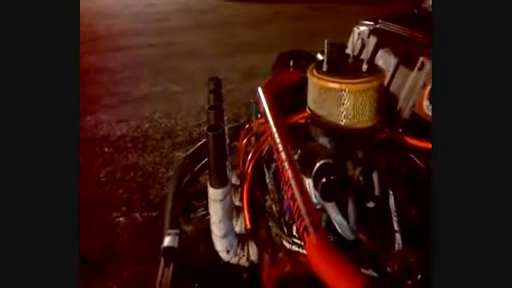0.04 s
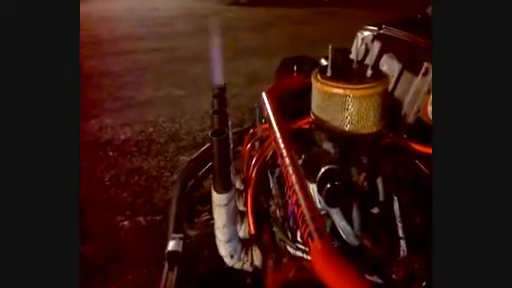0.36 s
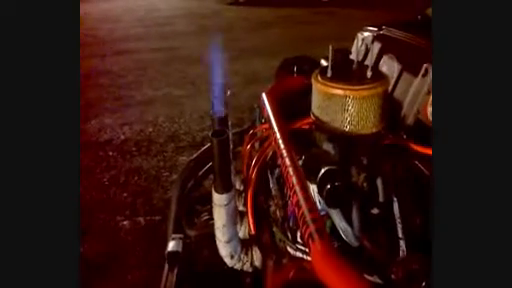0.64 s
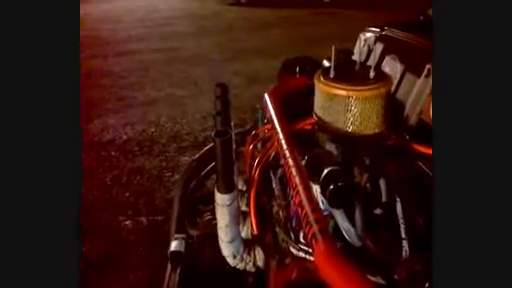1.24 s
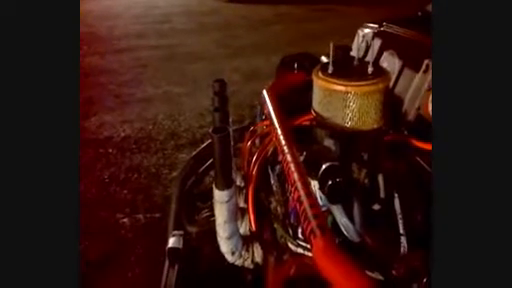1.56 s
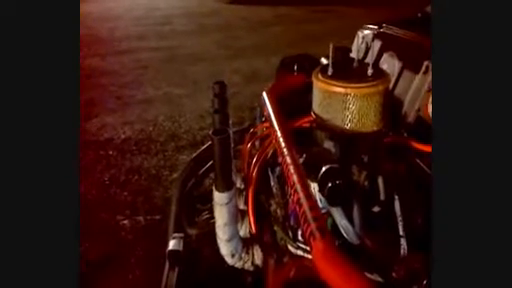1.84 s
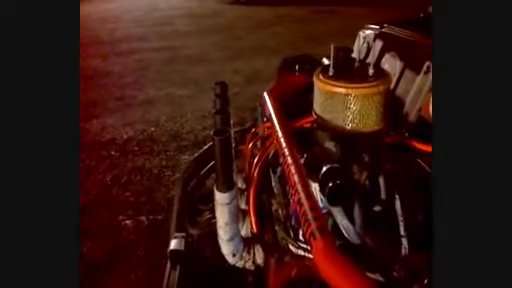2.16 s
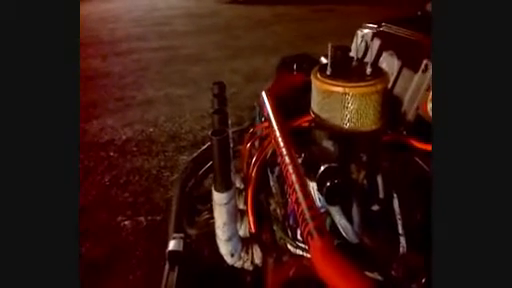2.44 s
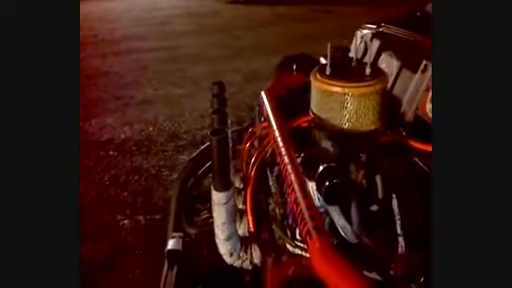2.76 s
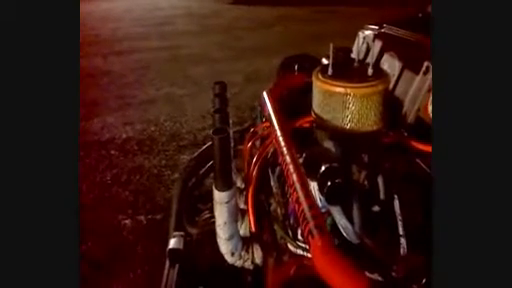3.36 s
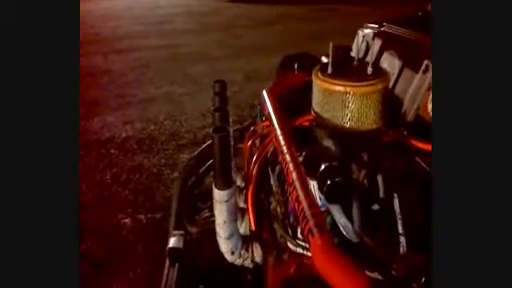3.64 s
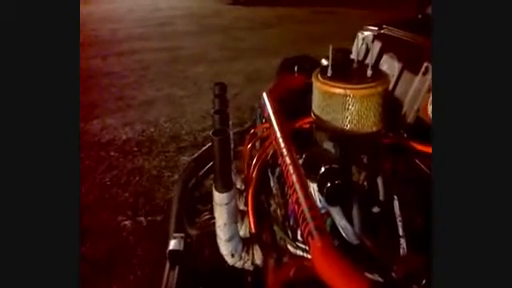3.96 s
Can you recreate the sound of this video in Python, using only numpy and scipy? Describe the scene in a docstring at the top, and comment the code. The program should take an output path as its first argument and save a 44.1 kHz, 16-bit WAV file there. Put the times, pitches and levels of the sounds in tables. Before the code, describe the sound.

An engine with an open exhaust roars at high revs, then falls steadily in pitch and fades. Sharp exhaust cracks give way to hollow pops, soft chugs and faint knocks. The very close microphone distorts on the loudest moments.

```python
"""Race engine winding down

A four-cylinder engine with an open exhaust is held at high revs, shut off, and slows almost to rest.
Uneven exhaust pulses excite the resonances of the pipe, and the valve gear clatters. Unburnt fuel
ignites in crackle, sharp cracks and hollow pops; a few light knocks come last. The microphone is so
close that it saturates on the revs and on the loud pops."""
import sys
import numpy as np
from scipy import signal
from scipy.fft import rfft, irfft
from scipy.io import wavfile
from scipy.ndimage import uniform_filter1d

SR = 44100
rng = np.random.default_rng(int(sys.argv[2]) if len(sys.argv) > 2 else 0)


def wrap_up_sound(samples):
    """Save the sound to the file named by the first command line argument, as 16-bit audio."""
    columns = np.atleast_2d(samples).T
    # keep every value between -1 and 1, then stretch to whole-number steps
    tamed = np.clip(columns, -1, 1)
    steps = np.round(tamed * 32767).astype(np.int16)
    wavfile.write(sys.argv[1], SR, steps)


N = 176400

# firing rate of the engine: t/s, f/Hz
FIRING_RATE = [(0, 226.8), (.17, 224.8), (.25, 220.2), (.4, 208.9), (.55, 194.7), (.75, 180.7), (1, 164.6),
               (1.5, 135.6), (2, 110.7), (2.48, 89.08), (2.9, 73.56), (3.35, 57.38), (4, 39.01)]
# running levels: t/s, exhaust pulses/dB, firing hum/dB, valve clatter/dB
ENGINE_LEVELS = [(0, -45, -18, -13.5), (.15, -14, -15, -11), (.23, -8.5, -16.5, -9), (.5, -9, -10.5, -15.5),
                 (.8, -5.5, -28.5, -20), (1.1, -15.5, -17.5, -23), (1.4, -18, -22, -25.5),
                 (1.7, -24, -25, -29.5), (2, -27, -25, -32), (2.25, -27.5, -25.5, -34),
                 (2.6, -31, -35.5, -36.5), (2.95, -36, -43.5, -38.5), (3.2, -39.5, -37, -41.5),
                 (3.6, -44.5, -53, -47.5), (4, -50.5, -58, -56)]
# exhaust pulse of each cylinder: level/dB
CYLINDER_PULSES = [-0.5, -9, -6.5, -6.5]
# inequality of the strokes: t/s, factor on the dB values of each stroke pattern
UNEVENNESS = [(.2, 3.3), (.7, 3.5), (1.35, 1.48), (2.7, 0.85), (3.7, 1.25)]
# pipe response, with odd quarter-wave resonances: f/Hz, level/dB
PIPE_RESPONSE = [(25, -31.5), (50, -14.5), (100, -15), (160, -4.5), (215, -1.5), (285, 6.5), (325, 2.5),
                 (375, -12.5), (500, -19.5), (740, -22), (875, -7.5), (1080, -27), (1430, -22),
                 (1750, -52.5), (2000, -31), (2600, -54), (6000, -64.5)]
# harmonics of the four-stroke cycle under power: order, level/dB
POWER_HARMONICS = [(1, -11.5), (4, -6), (6, -10), (7, -10.5), (8, -16), (9, 0.5), (10, -13.5), (11, -7),
                   (12, -10.5), (13, -6.5), (14, -10), (15, -15), (19, -10.5), (21, -5), (22, -9.5),
                   (23, -9), (24, -7), (25, -14), (26, -14.5), (29, -9), (33, -7.5), (45, -17)]
# harmonics with the throttle shut: order, level/dB
GROWL_HARMONICS = [(3, -10.5), (5, -1), (7, -2.5), (8, 1), (10, -10.5)]
# envelope of the growl: t/s, level/dB
GROWL_ENVELOPE = [(.3, -10), (.8, -21.5), (1.5, -60)]
# upper pipe modes: f/Hz, level/dB, T60 without gas flow/s
PIPE_MODES = [(875, 0, .12), (1420, -6, .14), (1950, -14, .12)]
# envelope of the snarl: t/s, level/dB
SNARL_ENVELOPE = [(.25, -12), (1.1, -20.5), (1.45, -42), (4, -75)]
# chug of each cylinder: level/dB
CYLINDER_CHUGS = [-5, -11.5, -7.5, -22.5]
# spectrum of a puff of gas leaving the pipe: f/Hz, level/dB
PUFF_SPECTRUM = [(40, -29), (75, 0.5), (160, 8.5), (220, 5.5), (320, -2), (450, -19), (2000, -75)]
# envelope of the chugs: t/s, level/dB
CHUG_ENVELOPE = [(1.6, -38), (2.5, -33), (3.1, -34), (3.55, -36), (3.8, -44), (4, -48)]
# afterfires, dry cracks first and hollow pops later: t/s, boom/dB, crack/dB, crack time constant/s
AFTERFIRES = [(.167, -17, 14, .0064), (.427, -25, 12, .0014), (.481, -20, 7, .0026), (.525, -14, 8, .0026),
              (.618, -22, 13.5, .0024), (.7, -14, 14, .0028), (.878, -14, 8, .003), (.967, -10, 13, .0024),
              (1.096, -11, -3, .003), (1.252, -7, -2, .0024), (1.439, 0, -3.5, .0055),
              (1.657, -4.5, -12, .0036), (1.888, -3, -12, .0042), (2.086, -4, -5.5, .0035),
              (2.325, -3.5, -19, .0053), (2.347, -7, -5.5, .0022), (2.423, -9, 1, .0022),
              (2.544, -3, -7, .0021), (2.567, -9, -9, .002), (2.763, -7.5, -14, .002),
              (2.788, -4.5, -18, .0061), (2.804, -2.5, -15, .0028), (2.981, -20, -27, .005),
              (3.023, -4, -18, .0062), (3.159, -11, -20, .004), (3.272, -9, -27, .0063),
              (3.468, -19, -41, .0087), (3.495, -17, -40, .0087), (3.701, -19, -40, .008),
              (3.79, -28, -52, .008)]
# exhaust modes excited by a pop: f/Hz, level/dB, T60/s
BOOM_MODES = [(212, -5.5, 0.075), (288, -6, 0.046), (368.26, -13, 0.044), (512, -12, 0.044),
              (713, -17, 0.024)]
# spectrum of cracking gas: f/Hz, level/dB
CRACK_SPECTRUM = [(60, -2.5), (380, 7.5), (505, 6), (700, 1), (1500, -1.5), (2300, -11), (4000, -22.5),
                  (7000, -33.5), (16000, -61)]
# resonances of the cylinder head and valve covers: f/Hz, level/dB
HEAD_RESPONSE = [(450, -3), (700, -4.5), (920, 3), (1150, -6), (1440, 4.5), (1720, -7), (1980, 0.5),
                 (2400, -12.5), (2900, -16), (3450, -13), (3980, -16.5), (4600, -26.5), (6000, -23),
                 (8500, -26), (11000, -34), (16000, -34.5)]
# light knocks near rest: t/s, level/dB
LAST_KNOCKS = [(3.412, -36), (3.562, -36), (3.641, -39), (3.813, -40), (3.906, -43)]
# air buffeting the microphone: t/s, level/dB
BUFFET_ENVELOPE = [(0, -39), (.6, -24), (1.3, -29), (1.6, -36), (3, -37.5), (4, -51)]
# frequency response of the microphone: f/Hz, level/dB
MIC_RESPONSE = [(30, -7.5), (80, 3), (2000, -4.5), (4000, -5.5), (5000, -10.5), (6000, -16), (7200, -9.5),
                (10000, -5), (15000, -6)]

CYLINDERS, VALVES = 4, 16
PULSE_JITTER = .003  # share of one firing period


def exhaust(firing):
    """Pipe resonance: uneven pulses drive the air column, over a hum at the firing rate."""
    early = firing + .04 * curve(FIRING_RATE)  # pulses enter the pipe 0.04 s before they are heard
    pulses = strokes(early, CYLINDER_PULSES, scatter_db=1.6, jitter=PULSE_JITTER)
    pipe = unit(convolve(pulses, disperse(response(PIPE_RESPONSE))))
    hum = unit(np.sin(2 * np.pi * firing) * undb(1.5 * wander(rate_hz=24.97)))
    return pipe * undb(curve(ENGINE_LEVELS, column=1)) + hum * undb(curve(ENGINE_LEVELS, column=2))


def roar(firing, shut_s=.19, fade_s=.043):
    """Periodic firing gives a harmonic series: harsh under power, a lower growl as the throttle shuts."""
    throttle = .5 - .5 * np.tanh((np.arange(N) / SR - shut_s) / fade_s)
    power = undb(-2.5) * harmonics(firing, POWER_HARMONICS)
    growl = harmonics(firing, GROWL_HARMONICS) * undb(curve(GROWL_ENVELOPE))
    return power * throttle + growl * (1 - throttle)


def snarl(firing):
    """Shock excitation: steep pulse fronts sound the upper pipe modes, which the gas flow damps."""
    fronts = strokes(firing, np.array(CYLINDER_PULSES) / 2, scatter_db=0, jitter=0)
    return unit(convolve(fronts, modes(PIPE_MODES, damping=4.4))) * undb(curve(SNARL_ENVELOPE))


def chugs(firing):
    """Pulsating flow: as the engine slows, each stroke is heard as a soft, deep puff."""
    pulses = strokes(firing, CYLINDER_CHUGS, scatter_db=2, jitter=PULSE_JITTER)
    return unit(convolve(pulses, disperse(response(PUFF_SPECTRUM)))) * undb(curve(CHUG_ENVELOPE))


def afterfires(full_revs_edge_hz=1480, whoop_db=-21.5):
    """Impulse excitation: exploding fuel rings the exhaust, whoops out of the pipe and cracks."""
    t = np.arange(SR // 10) / SR
    rate = curve(FIRING_RATE)
    blows, bursts = np.zeros(N), np.zeros(N + len(t))
    for start, boom_db, crack_db, decay in AFTERFIRES:
        i = int(start * SR)
        blows[i] += undb(boom_db)
        edge_hz = full_revs_edge_hz * (rate[i] / rate[0]) ** 2  # cracks are thinner at high revs
        highpass = signal.butter(2, edge_hz, "highpass", fs=SR, output="sos")
        burst = np.exp(-t / decay) * rng.standard_normal(len(t))
        bursts[i:i + len(t)] += undb(crack_db) * signal.sosfilt(highpass, burst)
    crack, whoop = response(CRACK_SPECTRUM), disperse(response(PUFF_SPECTRUM))
    booms = convolve(blows, modes(BOOM_MODES))
    whoops = undb(whoop_db) * convolve(blows, whoop / np.abs(whoop).max())
    return booms + whoops + convolve(bursts, crack / np.linalg.norm(crack))


def valve_gear(firing, rattle_db=14.5, treble_hz=5500, dull_below_rate_hz=85):
    """Structure-borne sound: valve impacts and a pulsing rattle ring the head, duller at low revs."""
    pattern_db = 5 * rng.standard_normal(VALVES)
    ticks = unit(strokes(VALVES / CYLINDERS * firing, pattern_db, scatter_db=-1, jitter=.039))
    rattle = undb(rattle_db) * rng.standard_normal(N)
    rate = curve(FIRING_RATE)
    slowness = np.sqrt(rate[0] / rate)  # the modulation deepens as the engine slows
    stroke, crank = np.cos(2 * np.pi * firing), np.cos(np.pi * firing)
    swell = np.exp(slowness * (.13 * stroke + .12 * crank))
    clatter = unit(convolve(swell * (ticks + rattle), response(HEAD_RESPONSE)))
    dull = signal.sosfiltfilt(signal.butter(4, treble_hz, fs=SR, output="sos"), clatter)
    brightness = np.minimum(rate / dull_below_rate_hz, 1) ** 1.9
    return (dull + brightness * (clatter - dull)) * undb(curve(ENGINE_LEVELS, column=3))


def crackle(snaps_per_s=80, start_db=-9, fade_db_per_s=18):
    """A Poisson process: tiny snaps of burning fuel come at random and fade steadily."""
    snaps = (rng.random(N) < snaps_per_s / SR) * rng.standard_normal(N)
    cracks = unit(convolve(np.diff(snaps, prepend=0), response(CRACK_SPECTRUM)))
    return cracks * undb(start_db - fade_db_per_s * np.arange(N) / SR)


def knocks():
    """Free vibration: near rest, light knocks leave the upper pipe modes ringing."""
    blows = np.zeros(N)
    for start, db in LAST_KNOCKS:
        blows[int(start * SR)] += undb(db)
    return convolve(blows, modes(PIPE_MODES))


def reverberation(x, level_db=-20, t60_s=.2, onset_s=.0051):
    """Diffuse reflection: the floor and surroundings return a short, faint tail."""
    t = np.arange(SR // 2) / SR
    tail = rng.standard_normal(len(t)) * np.exp(-np.log(1000) * t / t60_s) * (1 - np.exp(-t / onset_s))
    return undb(level_db) * convolve(x, tail / np.linalg.norm(tail))


def buffet(band_hz=(19.89, 135.25)):
    """Turbulence: stirred air presses on the microphone as a low rumble."""
    band = signal.butter(2, band_hz, "bandpass", fs=SR, output="sos")
    return unit(signal.sosfilt(band, rng.standard_normal(N))) * undb(curve(BUFFET_ENVELOPE))


def strokes(phase, pattern_db, scatter_db, jitter):
    """Impulse train: one click per turn of the phase, in a repeating pattern most uneven at high revs."""
    turn = np.arange(int(phase[-1]))
    timing, strength = rng.standard_normal((len(turn), 2)).T
    at = np.interp(turn + .5 + jitter * timing, phase, np.arange(N)).clip(0, N - 2)
    i = at.astype(int)
    stroke_db = np.array(pattern_db)[turn % len(pattern_db)] * curve(UNEVENNESS)[i]
    size = undb(stroke_db + scatter_db * strength)
    clicks = np.bincount(i, size * (1 - at + i), N) + np.bincount(i + 1, size * (at - i), N)
    return clicks / np.sqrt(np.gradient(phase))  # power independent of the click rate


def harmonics(firing, orders, roughness=.21):
    """Random modulation of amplitude and phase roughens the harmonics of the four-stroke cycle."""
    cycle = 2 * np.pi * firing / CYLINDERS
    total = np.zeros(N)
    for order, db in orders:
        modulation = 1 + roughness * (wander(rate_hz=58.4) + 1j * wander(rate_hz=56))
        phase = order * cycle + 2 * np.pi * rng.random()
        total += undb(db) * np.real(modulation * np.exp(1j * phase))
    return unit(total)


def disperse(h, sweep_hz=(69.6, 343.5), sweep_s=.04, size=16384):
    """Dispersion: the pipe lets low notes out first, turning a thud into a short rising whoop."""
    hz = np.arange(size // 2 + 1) * SR / size
    group_delay = np.interp(hz, sweep_hz, [0, sweep_s])
    return irfft(rfft(h, size) * np.exp(-2j * np.pi * np.cumsum(group_delay) * SR / size))


def modes(table, damping=1):
    """Modal superposition: damped sinusoids after one blow; damping divides each T60."""
    t = np.arange(SR // 2) / SR
    return sum((-1) ** k * undb(db) * np.sin(2 * np.pi * hz * t)
               * np.exp(-np.log(1000) * damping * t / t60) for k, (hz, db, t60) in enumerate(table))


def response(points, size=8192):
    """Minimum-phase impulse response of a spectrum (f/Hz, level/dB)."""
    hz, db = np.array(points).T
    grid = np.maximum(np.arange(size // 2 + 1) * SR / size, 1)
    cepstrum = irfft(np.log(undb(np.interp(np.log(grid), np.log(hz), db))))
    cepstrum[1:size // 2] *= 2
    cepstrum[size // 2 + 1:] = 0
    return irfft(np.exp(rfft(cepstrum)))


def convolve(x, h):
    """Linear filtering by an impulse response."""
    return signal.fftconvolve(x, h)[:N]


def wander(rate_hz):
    """Smoothed random noise of rms 1."""
    hold = int(SR / rate_hz)
    steps = np.repeat(rng.standard_normal(N // hold + 1), hold)
    return unit(uniform_filter1d(steps, hold)[:N])


def curve(table, column=1):
    """Linear interpolation of a timed table at every sample."""
    rows = np.array(table)
    return np.interp(np.arange(N) / SR, rows[:, 0], rows[:, column])


def undb(db):
    """Amplitude ratio of a level."""
    return 10 ** (np.asarray(db) / 20)


def unit(x):
    """Normalisation to rms 1."""
    return x / np.sqrt(np.mean(x ** 2))


def scene():
    """Superposition: the direct sound of the engine, its reflections and the stirred air."""
    firing = np.cumsum(curve(FIRING_RATE)) / SR  # phase, one turn per firing
    direct = (roar(firing) + exhaust(firing) + snarl(firing) + chugs(firing) + valve_gear(firing)
              + crackle() + afterfires() + knocks())
    return (direct + reverberation(direct) + buffet())[None]


def record(dry, ceiling_db=-9.5, top_hz=15750):
    """Saturation: the microphone overloads softly, then colours the sound and cuts the top."""
    ceiling = undb(ceiling_db)
    saturated = ceiling * np.tanh(dry[0] / ceiling)
    lowpass = signal.ellip(10, .1, 80, top_hz, fs=SR, output="sos")
    return signal.sosfilt(lowpass, convolve(saturated, response(MIC_RESPONSE)))[None]


dry = scene()
out = record(dry)
wrap_up_sound(out)
```